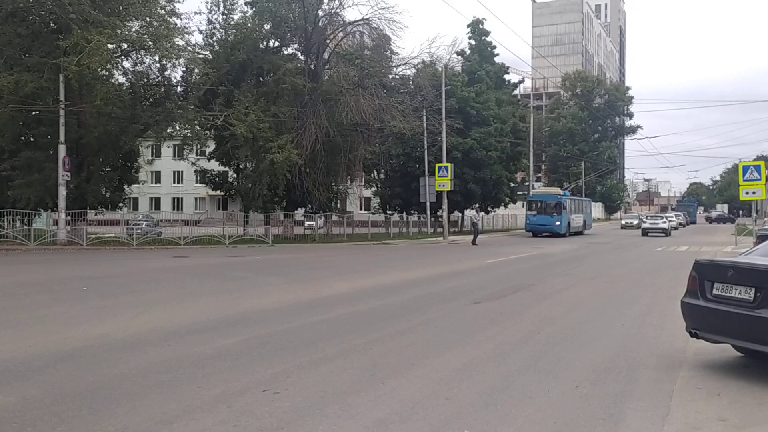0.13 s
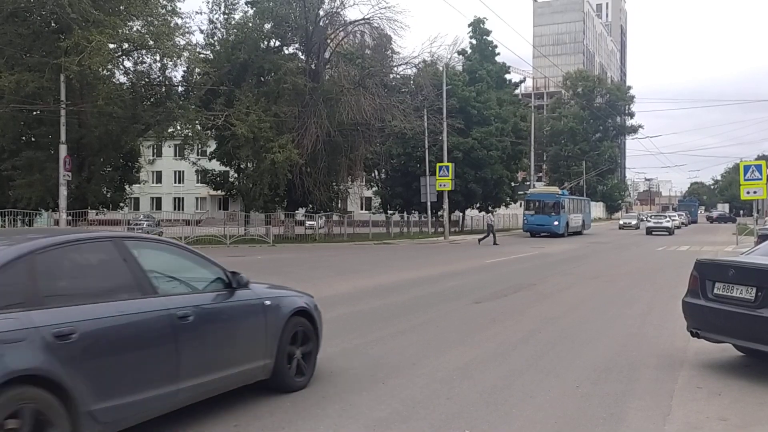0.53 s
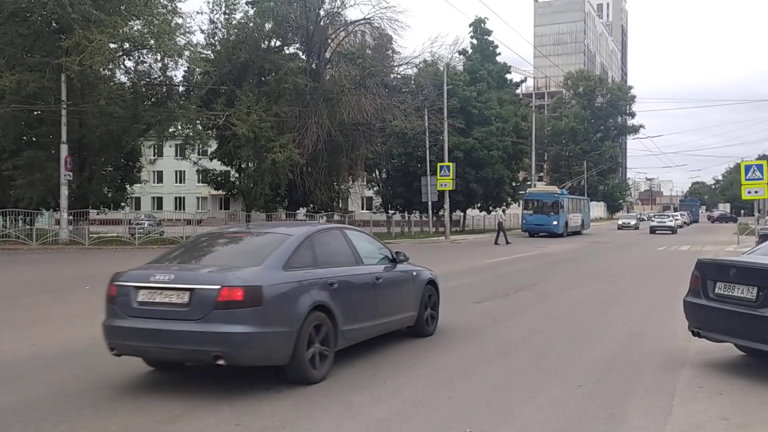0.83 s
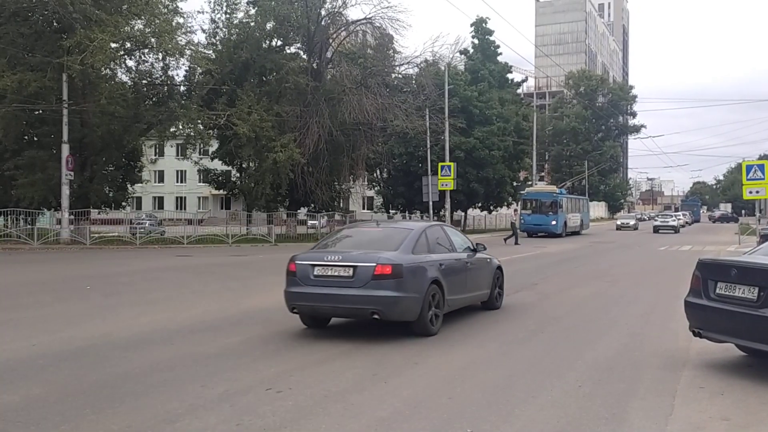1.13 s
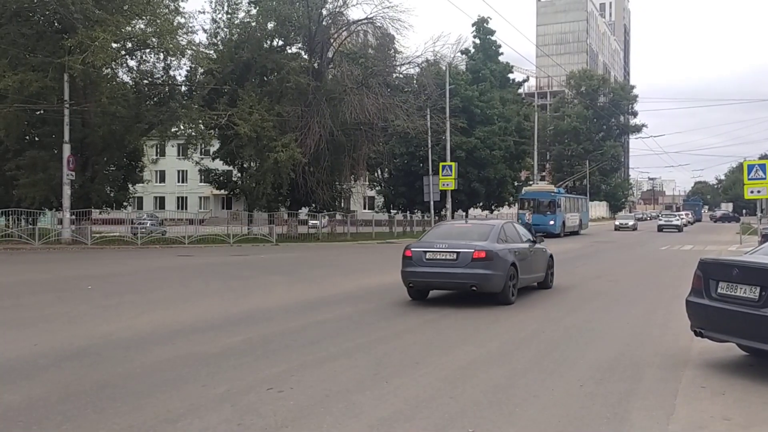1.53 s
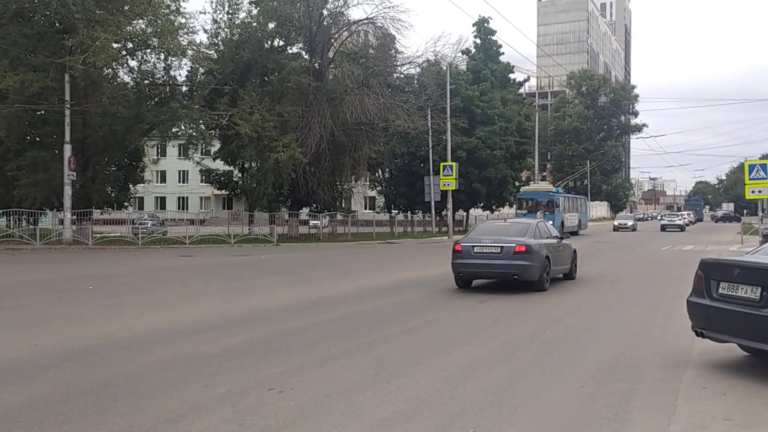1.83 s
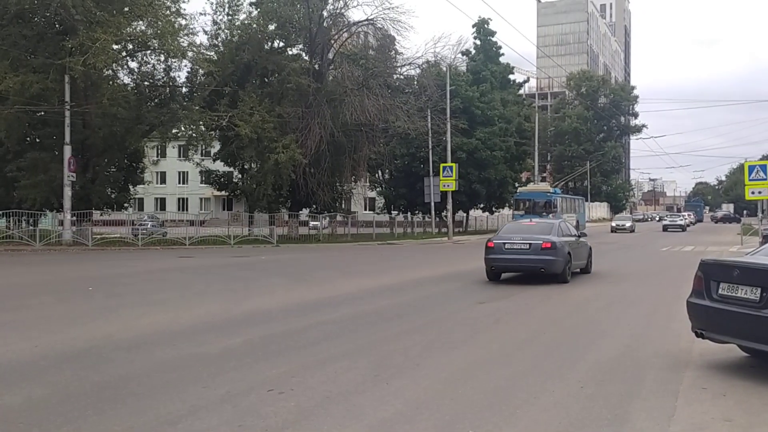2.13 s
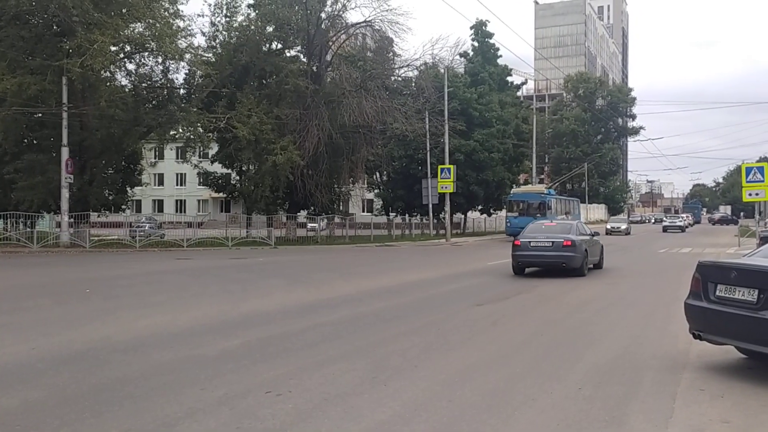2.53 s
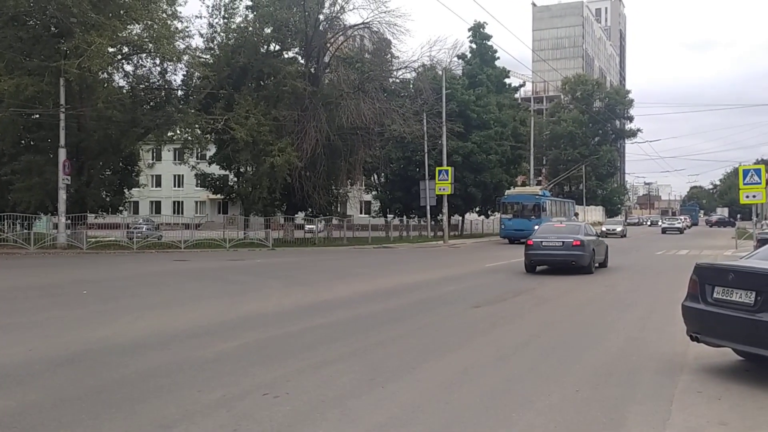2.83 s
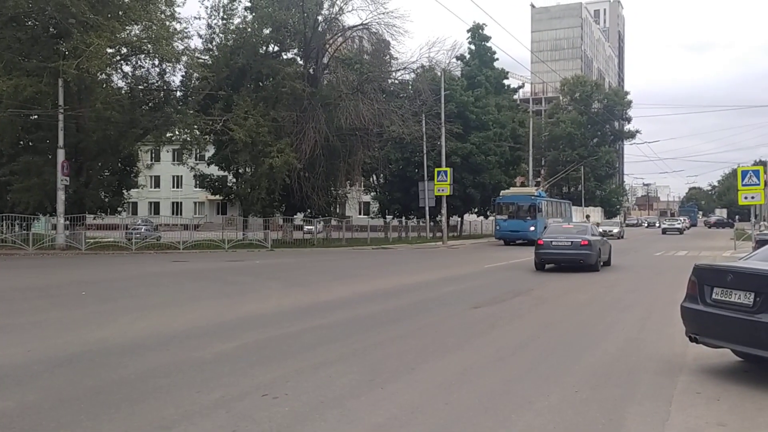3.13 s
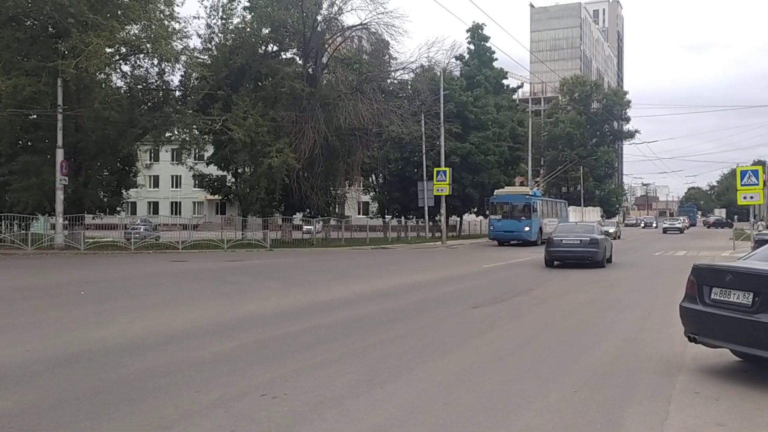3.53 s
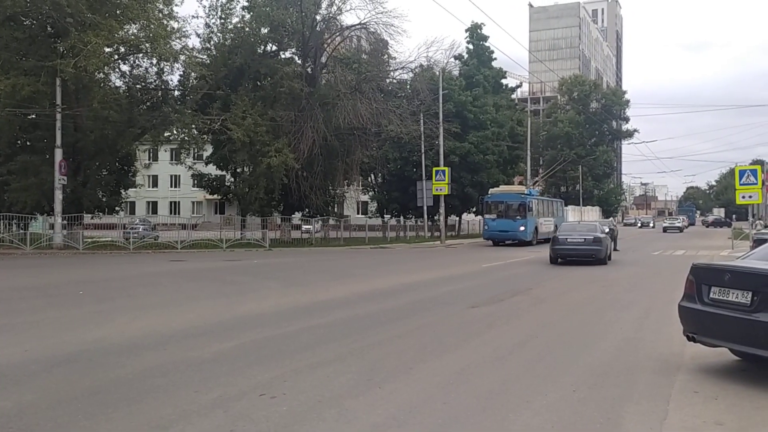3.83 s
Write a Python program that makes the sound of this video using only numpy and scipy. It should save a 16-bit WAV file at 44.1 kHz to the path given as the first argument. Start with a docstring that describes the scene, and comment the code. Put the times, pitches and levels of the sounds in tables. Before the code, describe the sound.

A car rolls past very close with a rushing tyre roar, then recedes under buffeting wind

```python
"""A saloon car rolls close past a phone on a city junction and drives away: filtered noise for the roar,
hiss and tread noise of two axles and the rush under the bonnet, with a long echo off the house fronts.
Behind it: a steady wash and rumble of traffic, a far air-brake puff and a faint narrow-band whine.
Gusts buffet the two microphone ports, mostly the right, as low noise that tears and rings hollow."""
import sys
import numpy as np
from scipy import signal
from scipy.fft import rfft, irfft
from scipy.io import wavfile
from scipy.ndimage import uniform_filter1d, map_coordinates

SR = 44100
rng = np.random.default_rng(int(sys.argv[2]) if len(sys.argv) > 2 else 0)


def put_to_file(sound):
    """Save the sound as 16-bit audio at rate SR, in the file named by the first command-line argument."""
    columns = np.atleast_2d(sound).T  # one column per channel
    safe = np.clip(columns, -1, 1)
    whole_steps = np.round(safe * 32767)
    wavfile.write(sys.argv[1], SR, whole_steps.astype(np.int16))


N = 176400

START_S, EDGE_S, TOP_HZ = 0.341, 0.004, 13700  # cut-in time; length of the edge ramps; top of the band

# Distant traffic
# wash spectrum: frequency_hz, level_db
TOWN_SPECTRUM = [(300, -6), (430, -9.5), (600, -0.5), (780, 3.5), (1000, -11), (1400, -2), (1750, -19),
                 (2150, -8), (2550, -8.5), (3100, -9.5), (4800, -11), (6000, -9.5), (7200, -9), (9000, -17),
                 (10200, -29), (13500, -41)]
# engine rumble spectrum: frequency_hz, level_db
RUMBLE_SPECTRUM = [(25, 4), (60, 6), (120, -14.5), (250, -15.5), (400, -13), (700, -11), (2000, -73)]
# likeness of the ports for far sound: frequency_hz, likeness_0_to_1
TOWN_ALIKE = [(400, 0.96), (800, 1), (2600, 1), (4500, 0.33)]
TOWN_DB, RUMBLE_DB, TOWN_LAG_S, TOWN_PAN_DB = -43, -48, 0.00029, -2

WHINE_HZ, WHINE_BAND_HZ, WHINE_S, WHINE_WIDTH_S = 7690, 80, 2.75, 1.0
WHINE_DB, WHINE_WAVER_DB, WHINE_PAN_DB = -58.5, 1.8, 12

# Air brake spectrum: frequency_hz, level_db
BRAKE_SPECTRUM = [(1500, -12), (3000, -1), (4500, 0.5), (6000, 0), (7500, 0), (9000, -0.5), (10500, -15),
                  (13500, -23)]
BRAKE_S, BRAKE_ATTACK_S, BRAKE_HOLD_S, BRAKE_DECAY_S = 2.472, 0.042, 0.17, 0.09
BRAKE_DB, BRAKE_PAN_DB = -34, 4
VALVE_HZ, VALVE_WIDTH_HZ, VALVE_DB, VALVE_DECAY_S = 5700, 2700, -43.5, 0.051

# Wind gusts: centre_s, half_length_s, left_db, right_db, ring_db (hollow ring against the deep buffet)
GUSTS = [(0.374, .042, -52, -23.5, -17), (0.984, 0.016, -45, -19.5, -6), (1.03, 0.031, -50, -21.5, -17),
         (1.094, 0.0059, -29, -19, -12), (1.173, 0.067, -51, -30, -7), (1.504, 0.037, -60, -28, -19),
         (1.564, 0.015, -41, -19.5, -8), (1.646, .04, -42, -20.5, -5), (1.722, 0.048, -40, -32, -13),
         (1.841, .012, -43, -27.5, 2.5), (1.948, 0.046, -40, -25, -5), (1.983, 0.011, -33, -23.5, -6),
         (2.061, .028, -28.5, -26, -1), (2.118, 0.017, -26, -18, -3.5), (2.165, 0.021, -32, -24.5, -4),
         (2.258, 0.052, -48, -25, -6), (2.604, 0.013, -59, -33, -9), (2.702, 0.0091, -55, -27, -12),
         (2.902, 0.025, -37.5, -47, -4), (2.987, 0.038, -45, -23, -3.5), (3.083, 0.049, -47, -22.5, 0.5),
         (3.137, 0.011, -46, -25, -1), (3.208, 0.024, -55, -28, -2), (3.301, 0.034, -33.5, -24, 1),
         (3.37, 0.022, -35, -28, 1), (3.441, 0.017, -37, -28, 4), (3.52, 0.038, -42, -22.5, 3.5),
         (3.59, 0.045, -46, -29.5, -9), (3.735, 0.031, -48, -31, -5), (3.975, 0.043, -39, -26, -3.5)]
# deep buffet spectrum: frequency_hz, level_db
BUFFET_SPECTRUM = [(20, 0), (40, 3.5), (65, -2), (100, -0.5), (130, -5.5), (175, 0.5), (230, -7),
                   (320, -13), (410, -21.5), (700, -39), (1500, -72), (5000, -92.5)]
# tearing noise spectrum: frequency_hz, level_db
TEAR_SPECTRUM = [(100, -11), (190, -1.5), (300, -3.5), (480, -7), (900, -27), (3000, -69)]
# hollow port ring spectrum: frequency_hz, level_db
RING_SPECTRUM = [(90, -26.5), (150, -5.5), (195, 3), (250, -8.5), (400, -28), (1500, -81)]
BREEZE_DB, EDDY_HZ, EDDY_DB = -42.5, 45.16, 2  # wind between gusts; rate and depth of its flutter
GUST_EDGE, SWIRL_S = 2.4, 0.03  # exponent of gust rise and fall; time over which eddies even out
TEAR_DB, STRONG_DB = -9.5, -19.5  # tear against buffet in a gust of the strong level

# House-front echo spectrum: frequency_hz, level_db
ECHO_SPECTRUM = [(200, -17), (700, -12), (1100, 1), (1500, -2), (1850, -1), (2150, -15), (2700, -17),
                 (4500, -22), (9000, -23)]
ECHO_DB, ECHO_T60_S, ECHO_DELAY_S = -11.5, 7.1, 0.071

# Car
# tyre roar spectrum: frequency_hz, level_db
ROAR_SPECTRUM = [(30, -7), (120, -12), (210, -0.5), (320, 0), (430, -10), (700, -1), (950, -1.5),
                 (1300, -5), (2000, -2), (3000, -14.5), (5000, -29), (9000, -22.5), (10500, -42),
                 (14000, -61)]
# tyre hiss spectrum: frequency_hz, level_db
HISS_SPECTRUM = [(1500, -4.5), (3000, -8.5), (4500, -3.5), (6200, -5.5), (7500, -9.5), (9000, -12),
                 (10200, -20), (13500, -29)]
# tread noise thrown backwards, spectrum: frequency_hz, level_db
HORN_SPECTRUM = [(500, -16.5), (1000, -9), (1400, -4), (1780, -3.5), (2100, -14), (2500, -10.5),
                 (3600, -13.5), (4700, -20.5), (9000, -42), (11000, -52)]
# rush from under the bonnet, spectrum: frequency_hz, level_db
BAY_SPECTRUM = [(300, -5.5), (550, 0), (760, 6.5), (1050, -11), (1450, -18), (2200, -45), (6000, -13.5),
                (10000, -34)]
# likeness of the ports for the car: frequency_hz, likeness_0_to_1
CAR_ALIKE = [(100, 0.94), (750, 0.97), (1700, 0.58), (3000, 0.56), (5000, 0.75)]
# roar and tread noise, apart from distance: time_s, level_db
TYRE_LEVEL = [(.35, -0.5), (.55, 0.5), (.68, .2), (.81, 1), (.95, 0), (1.45, 0), (1.85, 1.8), (2.03, 0.6),
              (2.25, 0.1), (2.55, 1), (2.85, -2), (4.0, 1)]
SPEED_M_S, PASSES_S, LANE_M, WHEELBASE_M = 8.04, 0.46, 3.66, 1.9
PORT_LAG_S, FACING_S = 0.00024, 0.733  # largest lag between ports; time at which the car's lag is zero
ROAR_DB, HISS_DB, HORN_DB = -22, -31, -28.5  # before distance, direction and swell
ROAR_FALL, HISS_FALL, HORN_FALL = 1.235, 1.25, 1.76  # powers of distance
HISS_SHADOW_DB, HISS_PAN_DB, GRAIN_DB = 10, 5, 0.72  # hiss loss from behind; pan; asphalt roughness
BAY_DB, BAY_SHADOW_DB = -27.5, 13  # bay rush; its loss from behind

# Left port over right port: frequency_hz, difference_db
PORT_COLOUR = [(300, -3), (500, 7.5), (820, -3), (1100, 1.5), (1450, 2), (1750, -7.5), (2100, 1.5),
               (2520, 2), (3150, 7.5), (4600, 4), (6200, 11), (7700, -2), (9000, -7.5), (11000, -1.5)]
# Phase lead of the left port added by the phone: frequency_hz, lead_rad
PORT_LEAD = [(300, 0), (700, -0.36), (1000, 0.22), (1650, -0.5), (2000, 0.98), (2250, -0.17), (2750, 2.3),
             (3000, 4), (4400, 12.5), (7000, 32.5), (13500, 77)]


def undb(db):
    """Decibels to gain."""
    return 10 ** (np.asarray(db) / 20)


def bins():
    """Frequencies in Hz of a full-length spectrum, at least 1."""
    return np.maximum(np.arange(N // 2 + 1) * SR / N, 1)


def read(table):
    """Interpolate (Hz, value) on a log-frequency axis."""
    hz, value = np.array(table, float).T
    return np.interp(np.log(bins()), np.log(hz), value)


def noise(db):
    """Noise of rms 1 with the given dB per frequency."""
    x = irfft(rfft(rng.standard_normal(N)) * undb(db), N)
    return x / x.std()


def walk(rate_hz):
    """Random line of spread about 1, with a new target rate_hz times a second."""
    step_samples = max(int(SR / rate_hz), 1)
    targets = rng.standard_normal(4096)
    line = np.interp(np.arange(N) / step_samples, np.arange(len(targets)), targets)
    return 1.2 * line  # restores the spread lost between targets


def resonance(hz, width_hz):
    """Steep-sided resonance, in dB per frequency."""
    return -20 * np.log10(1 + ((bins() - hz ** 2 / bins()) / width_hz) ** 2)


def ports(db, alike, lag_s):
    """One noise at both ports: a direct part that lags at the right one, and independent scatter."""
    share = np.clip(read(alike), 0.01, 0.99)
    left = irfft(rfft(noise(db)) * np.sqrt(share), N)
    right = map_coordinates(left, [np.arange(N) - lag_s * SR], order=3, mode="mirror")
    scatter = [irfft(rfft(noise(db)) * np.sqrt(1 - share), N) for _ in range(2)]
    return np.array([left, right]) + np.array(scatter)


def pan(db):
    """Left and right gains for a level difference, left over right."""
    return undb(np.array([[db], [-db]]) / 2)


def town():
    """Distant traffic: a smooth wash of tyres over the rumble of engines."""
    wash = undb(TOWN_DB + 0.5 * walk(2.17)) * ports(read(TOWN_SPECTRUM), TOWN_ALIKE, TOWN_LAG_S)
    rumble = undb(RUMBLE_DB + 1.1 * walk(8.6)) * ports(read(RUMBLE_SPECTRUM), TOWN_ALIKE, TOWN_LAG_S)
    return wash * pan(TOWN_PAN_DB) + rumble


def whine(t):
    """Thin narrow-band whine, perhaps a distant brake, that swells, falters and fades."""
    swell = np.exp(-((t - WHINE_S) / WHINE_WIDTH_S) ** 2)
    falter = undb(WHINE_WAVER_DB * walk(10))
    tone = noise(resonance(WHINE_HZ, WHINE_BAND_HZ))
    return undb(WHINE_DB) * swell * falter * tone * pan(WHINE_PAN_DB)


def air_brake(t):
    """Escaping air: a broad puff that dies away, and the valve's narrower hiss, held until it shuts."""
    age = np.maximum(t - BRAKE_S, 0)
    spectrum = read(BRAKE_SPECTRUM)
    puff = undb(BRAKE_DB) * np.exp(-age / BRAKE_DECAY_S) * ports(spectrum, TOWN_ALIKE, TOWN_LAG_S)
    held = np.exp(-np.maximum(age - BRAKE_HOLD_S, 0) / VALVE_DECAY_S)
    valve_spectrum = spectrum + resonance(VALVE_HZ, VALVE_WIDTH_HZ)
    valve = undb(VALVE_DB) * held * ports(valve_spectrum, TOWN_ALIKE, TOWN_LAG_S)
    attack = np.minimum(age / BRAKE_ATTACK_S, 1)
    return attack * undb(0.68 * walk(50)) * (puff + valve) * pan(BRAKE_PAN_DB)


def swirl(spectrum):
    """Turbulence whose strength stays even from eddy to eddy."""
    x = noise(read(spectrum))
    return x / np.sqrt(uniform_filter1d(x ** 2, int(SWIRL_S * SR)))


def wind(t):
    """Eddies shake each port on its own; gusts add power to the breeze, strong ones tear and ring more."""
    out = []
    for port in range(2):
        power, ring_power = undb(BREEZE_DB) ** 2, 0
        for centre_s, half_s, *port_db, ring_db in GUSTS:
            gust = undb(port_db[port]) ** 2 * np.exp(-np.abs((t - centre_s) / half_s) ** GUST_EDGE)
            power = power + gust
            ring_power = ring_power + gust * undb(ring_db) ** 2
        force = np.sqrt(power)
        buffet = force * swirl(BUFFET_SPECTRUM)
        tear = undb(TEAR_DB) * force * swirl(TEAR_SPECTRUM)
        ring = np.sqrt(ring_power) * swirl(RING_SPECTRUM)
        growth = np.sqrt(force / undb(STRONG_DB))  # tear and ring grow faster than the gust
        flutter = undb(EDDY_DB * walk(EDDY_HZ))
        flutter = flutter / np.sqrt(np.mean(flutter ** 2))
        out.append((buffet + (tear + ring) * growth) * flutter)
    return np.array(out)


def house_fronts(x, t):
    """Buildings around the junction return the car's sound as a long, dull wash: decaying-noise reverb."""
    age = np.maximum(t - ECHO_DELAY_S, 0)
    tail = np.minimum(age / ECHO_DELAY_S, 1) * undb(-60 * age / ECHO_T60_S)
    response = tail * ports(read(ECHO_SPECTRUM), TOWN_ALIKE, TOWN_LAG_S)
    band = (bins() > 900) & (bins() < 1800)  # unit mean power gain here
    response = response / np.sqrt(np.mean(np.abs(rfft(response[0]))[band] ** 2))
    return undb(ECHO_DB) * signal.fftconvolve(x[:1], response, axes=1)[:, :N]


def engine_bay(t):
    """Fan and engine rush from under the bonnet, hidden by the body once the nose has passed."""
    along_m = SPEED_M_S * (t - PASSES_S) + WHEELBASE_M / 2
    distance_m = np.hypot(along_m, LANE_M)
    behind = np.clip(along_m / distance_m, 0, 1)
    lag_s = PORT_LAG_S * SPEED_M_S * (t - FACING_S) / distance_m
    gain = undb(BAY_DB - BAY_SHADOW_DB * behind) * LANE_M / distance_m
    return gain * ports(read(BAY_SPECTRUM), CAR_ALIKE, lag_s)


def axle(t, offset_m):
    """One pair of tyres: roar falls with distance, hiss also from behind, tread noise is thrown backwards."""
    along_m = SPEED_M_S * (t - PASSES_S) + offset_m
    near = LANE_M / np.hypot(along_m, LANE_M)
    behind = np.clip(along_m * near / LANE_M, 0, 1)
    lag_along_m = SPEED_M_S * (t - FACING_S) + offset_m
    lag_s = PORT_LAG_S * lag_along_m / np.hypot(lag_along_m, LANE_M)

    roar = undb(ROAR_DB) * near ** ROAR_FALL * ports(read(ROAR_SPECTRUM), CAR_ALIKE, lag_s)
    horn_gain = undb(HORN_DB) * 2 * behind * near ** HORN_FALL
    horn = horn_gain * ports(read(HORN_SPECTRUM), CAR_ALIKE, lag_s)
    hiss_gain = undb(HISS_DB - HISS_SHADOW_DB * behind) * near ** HISS_FALL
    hiss = hiss_gain * ports(read(HISS_SPECTRUM), CAR_ALIKE, lag_s) * pan(HISS_PAN_DB)

    swell = undb(np.interp(t, *np.array(TYRE_LEVEL).T))
    grain = undb(GRAIN_DB * walk(300))
    return (swell * (roar + horn) + hiss) * grain / np.sqrt(2)  # two axles share the power


def car(t):
    """Nose and front tyres pass first, the rear tyres one wheelbase later."""
    return engine_bay(t) + axle(t, WHEELBASE_M / 2) + axle(t, -WHEELBASE_M / 2)


def scene():
    """Street, coloured and delayed differently by each port, plus wind on the ports."""
    t = np.arange(N) / SR
    passing = car(t)
    street = town() + whine(t) + air_brake(t) + house_fronts(passing, t) + passing
    street = street * np.minimum(t / START_S, 1)  # full level from START_S
    colour = undb(read(PORT_COLOUR) / 2)
    right_delay = np.exp(-1j * read(PORT_LEAD))
    return irfft(rfft(street) * np.array([colour, right_delay / colour]), N) + wind(t)


def record(dry):
    """Cut in and out abruptly, then low-pass steeply at TOP_HZ."""
    t = np.arange(N) / SR
    running = np.clip(np.minimum(t - START_S, t[-1] - t) / EDGE_S, 0, 1)
    low_pass = signal.ellip(10, 0.2, 80, TOP_HZ, fs=SR, output="sos")
    return signal.sosfilt(low_pass, dry * running)


dry = scene()
out = record(dry)
put_to_file(out)
```